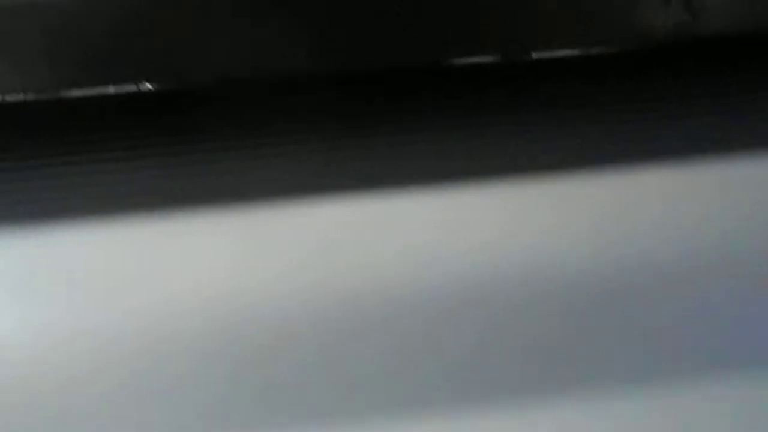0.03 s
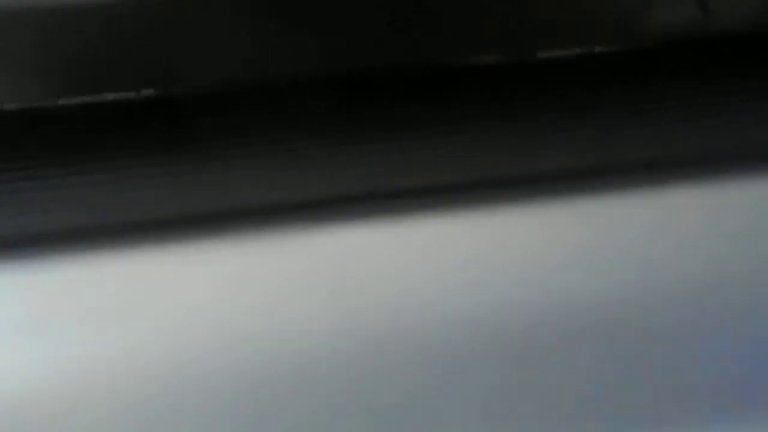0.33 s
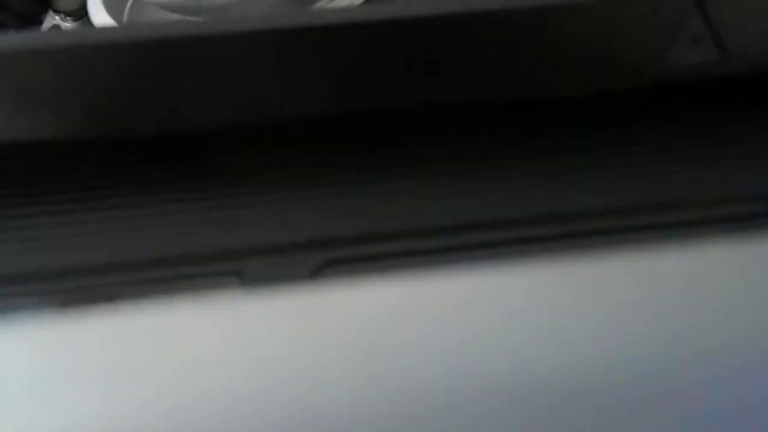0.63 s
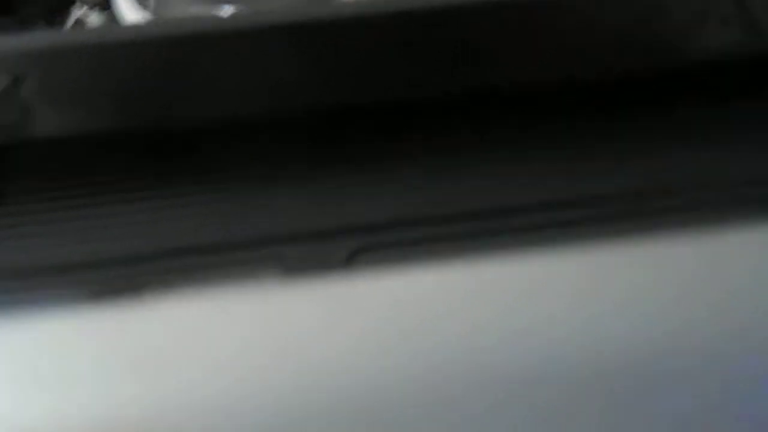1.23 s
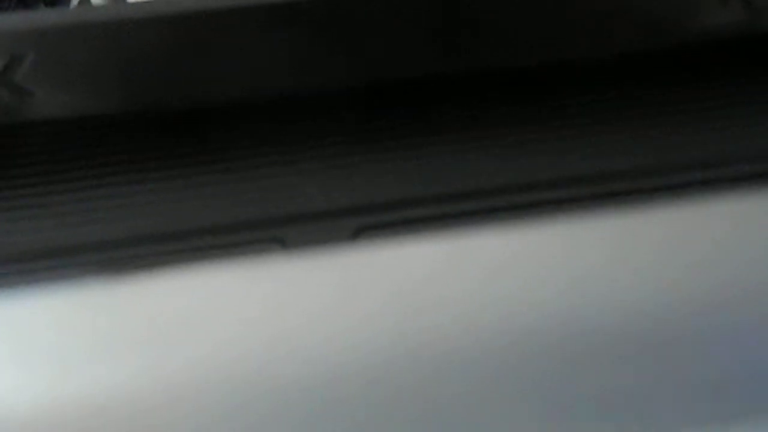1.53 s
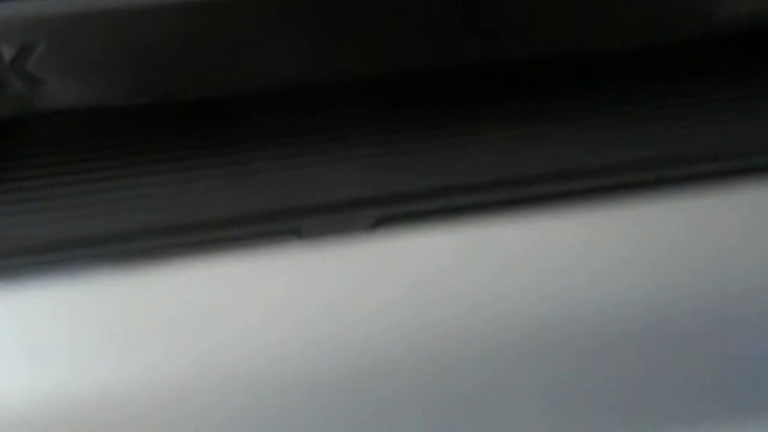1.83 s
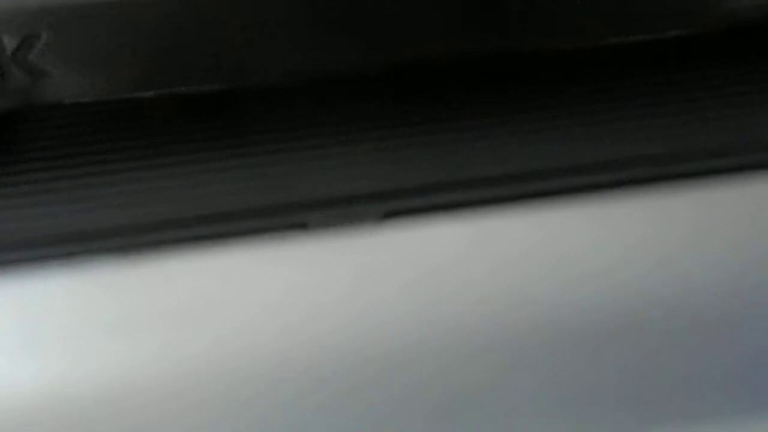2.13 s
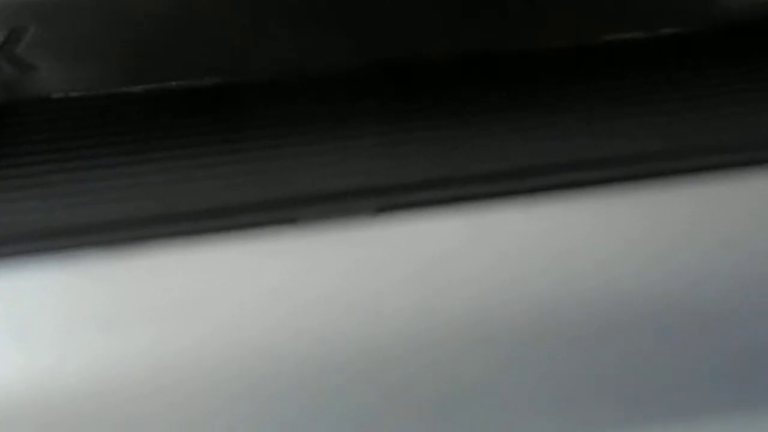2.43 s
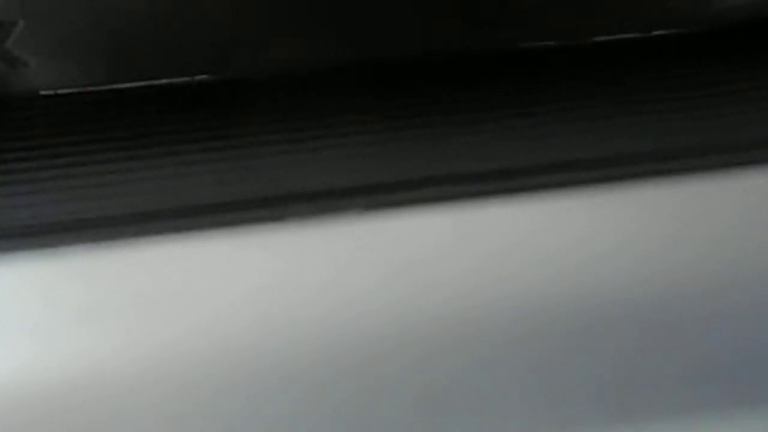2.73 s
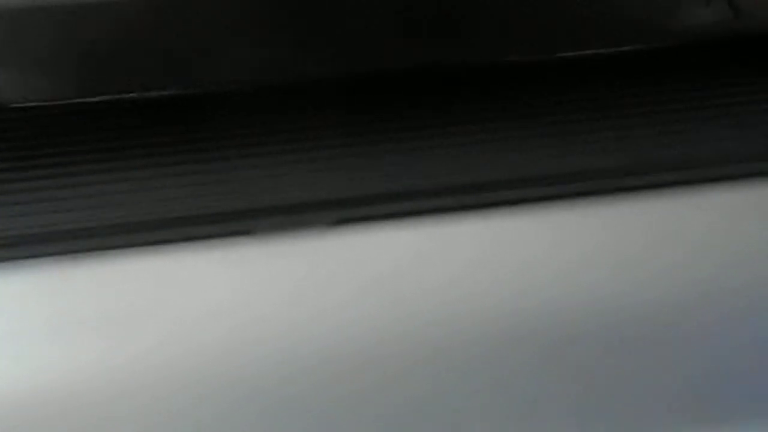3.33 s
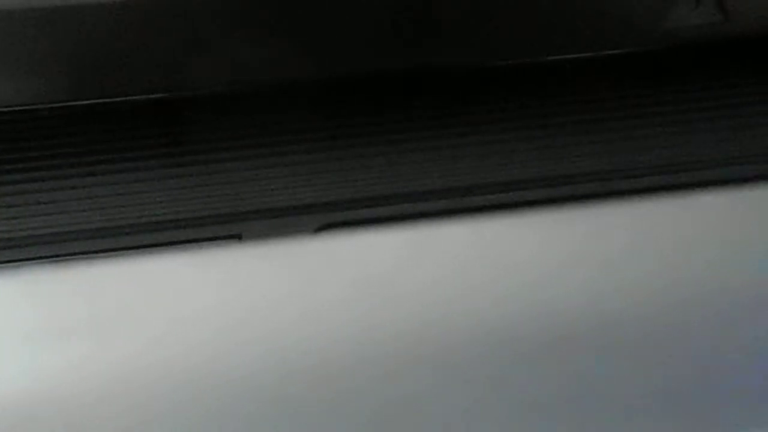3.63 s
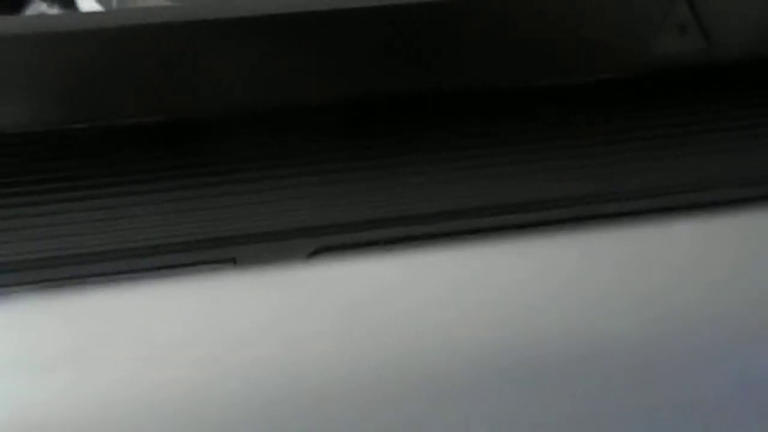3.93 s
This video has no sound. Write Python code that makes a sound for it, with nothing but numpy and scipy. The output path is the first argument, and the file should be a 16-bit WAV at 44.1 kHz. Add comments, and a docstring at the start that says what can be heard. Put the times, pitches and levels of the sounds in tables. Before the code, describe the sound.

A video recorder mechanism whirs and clunks, then its loading motor grinds through gears.

```python
"""Close to the open deck of a video recorder. From the start the head drum whirs and its motor whines
over capstan tones and mains hum, while two heads brush the tape on each turn. From 0.3 s a sprung lever
rings, the mechanism clunks and ticks, and three times the running sound dips. At 2.5 s the loading
motor starts and the carriage thuds. Meshing teeth drive the resonances of the gearbox; the motor slows
under load, knocking once per turn, and runs free again near 3.6 s."""
import sys
import numpy as np
from scipy import signal
from scipy.fft import irfft
from scipy.io import wavfile

SR = 44100
rng = np.random.default_rng(int(sys.argv[2]) if len(sys.argv) > 2 else 0)


def persist_wave(psi):
    """Save psi, clipped to +-1, as 16-bit WAV."""
    counts = np.round(np.clip(psi, -1, 1) * 32767).astype(np.int16)
    wavfile.write(sys.argv[1], SR, np.atleast_2d(counts).T)


N = 176400
T = np.arange(N) / SR

# running drum: time_s, whir_db, brush_db, middle_whine_db
DRUM_LEVELS = [(0, -38, -60, -7), (.29, -36, -51.5, -20), (.38, -33.5, -46, 2), (.8, -33, -44, -0.5),
               (1.25, -32.5, -43.5, -0.5), (1.8, -33, -43.5, 0.5), (2.39, -32.5, -44.5, -1),
               (2.44, -32, -57, -10), (2.7, -46.5, -45, 1), (4, -39.5, -53.5, 7)]
# spectra of the whir, a head brushing the tape and a head meeting it: frequency_hz, density_db
WHIR_SPECTRUM = [(18, -45.5), (30, -19.5), (59, -31.5), (102, -28.5), (133, -31), (313, -21), (510, -22.5),
                 (605, -19.5), (651, -17), (701, -17.5), (754, -21), (811, -11.5), (1090, -11.5),
                 (1200, -9.5), (1610, -13.5), (1820, -14.5), (2210, -18.5), (3510, -13.5), (4830, -26.5),
                 (5590, -24), (6470, -25.5), (7680, -24.5), (10300, -36), (13400, -67), (22000, -120)]
BRUSH_SPECTRUM = [(300, -43), (4800, -4.5), (6600, -17.5), (7500, -1.5), (8200, -2.5), (8700, -28.5),
                  (10500, -34)]
ENTRY_SPECTRUM = [(300, -15), (2500, 6.5), (4050, -16), (4700, -4.5), (5600, 6.5), (6300, -5.5),
                  (7000, -8.5), (10000, -41)]
# steady partials of the capstan, motor drive and mains: pitch_hz, level_db
CAPSTAN_TONES = [(29, -69), (706, -54.5), (881, -50.5), (1001, -51), (1234, -48.5), (1323, -46.5),
                 (1412, -49), (1428, -55)]
DRIVE_TONES = [(4797, -60), (5997, -76.5), (6795, -60.5), (8797, -64.5), (9196, -79), (9996, -59),
               (10396, -68)]
HUM_TONES = [(50, -74), (100, -71)]
# capstan loudness: time_s, gain_db
CAPSTAN_GAIN = [(0, -0.5), (.3, 0.5), (.5, 6), (1.1, 3), (2.3, 5), (2.7, 0), (3.5, 9.5), (4, 4.5)]
# drum motor partials: multiple_of_drum_rate, level_db
WHINE_HARMONICS = [(46, -53), (48, -35), (54, -62), (72, -40.5), (74, -65), (144, -47), (162, -57.5),
                   (220, -61.5), (240, -58)]
# drum motor loudness: time_s, whine_gain_db, drive_gain_db
MOTOR_GAINS = [(0, -6, -2.5), (.3, -4, 0.5), (.39, 2, -2), (2.38, 2.5, -5.5), (2.46, 0.5, 2),
               (2.9, -3.5, -4), (4, -4.5, -6)]

# blows on a sprung lever: start_s, level_db
SPRING_STRIKES = [(0.296, -16.5), (0.781, -28), (2.2545, -12.5)]
# its modes: pitch_hz, level_db, t60_s
SPRING_MODES = [(1019, 6.5, 0.053), (1127, 4, 0.024), (854, -18.5, 0.074), (1380, -7, 0.066),
                (3150, -1, 0.019)]
# clunks of the mechanism, including a run of knocks, one per turn, from the loading motor under load
# (2.86 to 2.99 s): start_s, body_db, crack_db, body_t60_s
MECHANISM_CLUNKS = [(0.3147, -31, -20.5, 0.017), (0.32, -13.5, -16, 0.047), (0.3356, -19.5, -17.5, 0.11),
                    (2.405, -34, -18, 0.049), (2.415, -27, -25, 0.085), (2.506, -21, -10.5, 0.062),
                    (2.538, -21, -13, 0.03), (2.551, -30, -16.5, 0.029), (2.588, -19.5, -15, .05),
                    (2.862, -15.5, -23, 0.031), (2.887, -13, -38, 0.011), (2.911, -11, -33, 0.011),
                    (2.9348, -9.5, -19, 0.012), (2.985, -13.5, -14.5, 0.051), (3.911, -17.5, -23, .05),
                    (3.918, -38, -18, .04)]
# spectra of a clunk's body, its crack and a tick: frequency_hz, density_db
CHASSIS_SPECTRUM = [(60, -31), (200, -28.5), (330, -3), (480, -11), (650, 2), (1050, 9), (1400, 1),
                    (2000, -43), (4000, -43), (10000, -70)]
CRACK_SPECTRUM = [(200, -22.5), (1000, 10.5), (1700, 12.5), (2400, -2.5), (3300, 4), (4200, -1.5),
                  (5200, -4.5), (7000, -11.5), (9000, -27.5), (11000, -39)]
TICK_SPECTRUM = [(150, -15), (1000, 1), (3000, -9), (5000, 2), (7000, 3), (8200, 3), (9500, -1),
                 (11000, -29)]
# dips in the running sound: start_s, depth_db
LEVEL_DIPS = [(.345, 9.5), (0.482, 5.5), (1.269, 10)]
# light impacts: start_s, level_db
SHARP_TICKS = [(0.467, -24), (0.4734, -19.5), (0.73, -27.5), (1.1665, -26.5), (1.26, -16.5), (2.932, -26),
               (3.7505, -16), (3.919, -22.5)]

# loading motor shaft: time_s, turns_per_s
SHAFT_SPEED = [(2.5, 38), (2.56, 47), (2.65, 50.6), (2.73, 51.2), (2.82, 43.3), (2.9, 41), (2.98, 39.8),
               (3.07, 41.3), (3.17, 43.5), (3.24, 39), (3.31, 33), (3.39, 32.3), (3.48, 39.5), (3.55, 46.7),
               (3.63, 48.3), (3.78, 48.05), (3.87, 48.3), (3.96, 44.5)]
# gear train loudness: time_s, gears_db, hiss_db
GEAR_LEVELS = [(2.52, -20, -40), (2.61, -18, -30.5), (2.75, -20, -32.5), (2.9, -19.5, -33.5),
               (3.05, -21, -36), (3.24, -19.5, -33), (3.33, -22, -33), (3.46, -18, -31.5),
               (3.6, -17.5, -30.5), (3.748, -17, -32), (3.758, -24.5, -37.5), (3.89, -23.5, -40),
               (4.0, -23.5, -39)]
# growl, mesh tones and knocks, each relative to gears_db: time_s, gain_db
GROWL_GAIN = [(2.5, -1.5), (2.8, -3.5), (2.9, -4), (3.05, -3), (3.4, -4), (3.6, -4.5), (3.88, -6), (4, -4)]
MESH_GAIN = [(2.5, -13.5), (2.7, -5), (2.95, -9.5), (3.15, -6.5), (3.4, -6.5), (3.55, -7), (3.65, -4),
             (3.86, -4), (4, -14.5)]
KNOCK_GAIN = [(2.5, -11), (2.66, -9.5), (2.8, -18), (2.86, -14), (3.0, -11), (3.1, -12), (3.38, -17),
              (3.46, -4.5), (3.6, -7.5), (3.75, -5), (3.88, -6.5), (4, -3)]
# irregular part of the force behind the growl: time_s, power_share
RATTLE_SHARE = [(2.5, 0), (2.7, 0.51), (2.8, 0.87), (3.1, 0.52), (3.45, 0.7), (3.63, 0.14), (3.86, 0.04),
                (3.92, 0.08), (4, 0.4)]
# gearbox response and gear hiss: frequency_hz, density_db
GEARBOX_SPECTRUM = [(40, -57), (120, -30.5), (250, -19.5), (400, -13), (500, -15.5), (570, -9.5), (650, -1),
                    (830, 0.5), (920, -3.5), (1060, 3), (1210, -5.5), (1310, -4), (1480, -1), (1620, -5),
                    (1800, -9), (2050, -15), (3500, -21), (5000, -27.5), (10000, -66)]
HISS_SPECTRUM = [(200, -36), (1500, -10), (2400, -6), (2900, -7.5), (3400, -1.5), (3900, -3.5),
                 (4400, -6.5), (4950, -5), (5550, -2.5), (6200, -3.5), (7200, -6.5), (8200, -15),
                 (9300, -16.5), (10500, -28)]
# partials of the meshing force: multiple_of_shaft_rate, level_db
MESH_HARMONICS = [(4, -11), (6, -3.5), (9, 5), (12, -3.5), (13, -8.5), (15, -1), (16, -8), (18, 2), (24, 3),
                  (30, -1.5), (36, -0.5), (48, 3.5)]
# worm gear modes: pitch_hz, level_db, t60_s
WORM_MODES = [(1121, 2.5, 0.019), (1500, -17, 0.028), (797, -8.5, 0.046)]
# metal parts that the gears set ringing: pitch_hz, bandwidth_hz, level_re_hiss_db
METAL_RESONANCES = [(2375, 48, -10), (2865, 55, -14.5), (3337, 64, -8), (4377, 110, -9), (5505, 89, -6),
                    (5910, 150, -13)]
# carriage impacts: start_s, level_db
CARRIAGE_THUDS = [(2.52, -34), (2.589, -22), (2.768, -37), (3.911, -42)]
# their spectrum: frequency_hz, density_db
THUD_SPECTRUM = [(40, -23), (130, -15), (220, 6), (290, 3.5), (450, -11), (2000, -61)]

DRUM_HZ, MOTOR_ON_S = 25, 2.505


def amp(db):
    """Amplitude ratio of a level in decibels."""
    return 10 ** (np.asarray(db) / 20)


def unit(x):
    """Normalisation to rms 1."""
    return x / np.sqrt(np.mean(x ** 2) + 1e-20)


def curve(rows, column=1):
    """Linear interpolation of a timed table at every sample."""
    rows = np.array(rows)
    return np.interp(T, rows[:, 0], rows[:, column])


def add(mix, start_s, sound):
    """Superposition of a delayed sound on the mix."""
    part = mix[round(start_s * SR):][:len(sound)]
    part += sound[:len(part)]


def colour(x, spectrum, size=8192):
    """Minimum-phase filtering by the given spectrum; rms 1."""
    points_hz, db = np.transpose(spectrum)
    hz = abs(np.fft.fftfreq(size, 1 / SR))
    log_gain = np.log(amp(np.interp(np.log(hz + 1), np.log(points_hz), db)))
    response = np.fft.ifft(np.exp(np.conj(signal.hilbert(log_gain)))).real[:size // 2]
    return unit(signal.oaconvolve(x, response)[:len(x)])


def resonate(x, hz, width_hz):
    """Forced response of one resonance with peak gain 1."""
    return signal.lfilter(*signal.iirpeak(hz, hz / width_hz, SR), x)


def noise():
    """Gaussian white noise."""
    return rng.standard_normal(N)


def revolving(turns, scatter_rad, count=420, size=8192):
    """Periodic force of a rough rotating surface; little phase scatter gives one knock per turn."""
    surface = irfft(np.r_[0, np.exp(1j * scatter_rad * rng.standard_normal(count))], size)
    return unit(np.interp(turns % 1, np.arange(size) / size, surface))


def tone(cycles):
    """Simple harmonic motion of random phase; rms 1."""
    return np.sqrt(2) * np.sin(2 * np.pi * (cycles + rng.random()))


def partials(rows, base):
    """Superposed sines: rates in hertz on a base of seconds, or multiples on a base of turns."""
    return sum(amp(db) * tone(rate * base) for rate, db in rows)


def blend(a, b, share):
    """Incoherent signals add in power; b takes the given share."""
    share = np.clip(share, 0, 1)
    return np.sqrt(1 - share) * a + np.sqrt(share) * b


def ring(modes, rise_s, size):
    """Free vibration: each mode decays exponentially."""
    t = T[:size]
    vibration = sum(amp(db - 60 * t / t60_s) * np.sin(2 * np.pi * hz * t) for hz, db, t60_s in modes)
    return vibration * (1 - np.exp(-t / rise_s))


def impact(spectrum, t60_s, blow=3.8, size=12000):
    """An impulse excites dense modes that decay together like fading noise."""
    fade = amp(-60 * T[:size] / t60_s)
    force = rng.choice([-1., 1.], size) * fade
    force[0] += blow
    return colour(force, spectrum) * np.sqrt(np.mean(fade ** 2))


def drum_whir(turns):
    """Rotation makes partly periodic noise, amplitude-modulated twice per turn."""
    rub = blend(noise(), revolving(turns, 10.22), 0.58)
    throb = 1 + 0.076 * np.cos(4 * np.pi * turns)
    softened = [(hz, db - 2.5 * (hz > 5000)) for hz, db in WHIR_SPECTRUM]
    return amp(curve(DRUM_LEVELS)) * colour(rub * throb, softened)


def capstan():
    """Steady rotation gives partials of fixed pitch, which swell and fade together."""
    return amp(curve(CAPSTAN_GAIN)) * partials(CAPSTAN_TONES, T)


def tape_heads(turns):
    """Friction in pulses: each of two heads rasps as it meets the tape, then brushes along it."""
    period_s = 0.5 / DRUM_HZ

    def contact(spectrum, at_s, width_s):
        """Surface roughness excites noise under a Gaussian envelope at each pass."""
        offset_s = (T - at_s + period_s / 2) % period_s - period_s / 2
        surface = blend(revolving(2 * turns, 10.97, count=210), revolving(turns, 10.04), 0.3)
        grain = blend(surface, noise(), 0.11)
        return colour(grain * np.exp(-0.5 * (offset_s / width_s) ** 2), spectrum)

    brush = contact(BRUSH_SPECTRUM, at_s=0.0019, width_s=0.0024)
    rasp = amp(1) * contact(ENTRY_SPECTRUM, at_s=0.01735, width_s=0.0028)
    balance = np.where(T < 0.4, 1 + np.cos(2 * np.pi * turns), 1)  # one head dominates at first
    return amp(curve(DRUM_LEVELS, 2)) * (brush + rasp) * balance


def flutter(rms_db=1.3, fastest_hz=22.01):
    """Random amplitude modulation: a gain that wavers with a sum of slow sines."""
    return amp(rms_db * unit(sum(tone(hz * T) for hz in rng.uniform(0, fastest_hz, 24))))


def drum_motor(turns):
    """Harmonics of the rotation rate make a whine, beside the thin fixed tones of the drive."""
    middle_gain = amp(curve(DRUM_LEVELS, 3)) * (1 + 0.3 * np.cos(4 * np.pi * turns))
    whine = sum(amp(db) * tone(k * turns) * (middle_gain if 1000 < k * DRUM_HZ < 1500 else 1)
                for k, db in WHINE_HARMONICS)
    drive = partials(DRIVE_TONES, T)
    return amp(curve(MOTOR_GAINS)) * flutter() * whine + amp(curve(MOTOR_GAINS, 2)) * drive


def mains_hum():
    """Alternating current hums at its fundamental and second harmonic."""
    return partials(HUM_TONES, T)


def mechanism_impacts():
    """Impact excitation: a spring rings in a few modes; clunks, motor knocks and ticks in many."""
    out = np.zeros(N)
    spring = ring(SPRING_MODES, rise_s=0.0038, size=SR // 2)
    for start_s, db in SPRING_STRIKES:
        add(out, start_s, amp(db) * spring)
    for start_s, body_db, crack_db, body_t60_s in MECHANISM_CLUNKS:
        add(out, start_s, amp(body_db) * impact(CHASSIS_SPECTRUM, body_t60_s))
        add(out, start_s, amp(crack_db) * impact(CRACK_SPECTRUM, t60_s=0.032))
    for start_s, db in SHARP_TICKS:
        add(out, start_s, amp(db) * impact(TICK_SPECTRUM, t60_s=0.0073))
    return out


def dip_gain(fall_s=0.0083, recover_s=0.42):
    """Exponential relaxation: the level drops quickly at set times and creeps back."""
    dip_db = 0
    for start_s, depth_db in LEVEL_DIPS:
        age_s = np.maximum(T - start_s, 0)
        dip_db += depth_db * np.minimum(age_s / fall_s, 1) * np.exp(-age_s / recover_s)
    return amp(-dip_db)


def gear_teeth(turns, throb):
    """Forced vibration: meshing and rattling teeth drive the gearbox; a panel booms under load."""
    share = curve(RATTLE_SHARE)
    rattle = unit(noise() * (1 + 0.57 * throb))
    growl = colour(blend(revolving(turns, scatter_rad=1.66), rattle, share), GEARBOX_SPECTRUM)
    mesh = colour(partials(MESH_HARMONICS, turns), GEARBOX_SPECTRUM)
    gears = (amp(curve(GROWL_GAIN)) * growl + amp(curve(MESH_GAIN)) * mesh) * (1 + 0.067 * throb)
    panel = 1.8 * share * resonate(gears, hz=632, width_hz=41)
    return gears + panel


def worm_knocks(turns):
    """An impulse train, one knock per turn, rings the worm gear; rattle makes the knocks uneven."""
    whole_turns = np.floor(turns)
    running = T > MOTOR_ON_S
    strengths = amp(4 * curve(RATTLE_SHARE) * noise())
    impulses = np.diff(whole_turns, prepend=whole_turns[0]) * strengths * running
    knocks = signal.oaconvolve(impulses, ring(WORM_MODES, rise_s=0.001, size=3000))[:N]
    return amp(curve(KNOCK_GAIN)) * unit(knocks) * np.sqrt(np.mean(running))


def gear_hiss(turns, throb):
    """Broadband gear noise pulses with the shaft, and metal parts resonate in narrow bands."""
    rub = blend(noise(), revolving(turns, 10.14), 0.45) * (1 + 0.19 * throb)
    metal = sum(amp(db) * unit(resonate(noise(), hz, width_hz)) for hz, width_hz, db in METAL_RESONANCES)
    return colour(rub, HISS_SPECTRUM) + metal


def loading_motor(knock_at_s=3.7215, rise_s=0.025):
    """Shaft angle, the integral of speed, keeps teeth, knocks and hiss in phase."""
    turns = np.cumsum(curve(SHAFT_SPEED)) / SR
    turns -= np.interp(knock_at_s, T, turns)
    throb = np.cos(2 * np.pi * turns)  # peaks at each worm knock
    gears = amp(curve(GEAR_LEVELS)) * (gear_teeth(turns, throb) + worm_knocks(turns))
    hiss = amp(curve(GEAR_LEVELS, 2)) * gear_hiss(turns, throb)
    return np.clip((T - MOTOR_ON_S) / rise_s, 0, 1) * (gears + hiss)


def carriage():
    """Impacts of the carriage excite low, damped modes, heard as thuds."""
    out = np.zeros(N)
    for start_s, db in CARRIAGE_THUDS:
        add(out, start_s, amp(db) * impact(THUD_SPECTRUM, t60_s=0.11))
    return out


def scene():
    """Superposition of all sources in one channel; only the running sound dips."""
    turns = DRUM_HZ * T
    running = drum_whir(turns) + capstan() + tape_heads(turns) + drum_motor(turns) + mains_hum()
    return (running * dip_gain() + mechanism_impacts() + loading_motor() + carriage())[None]


def record(dry, cutoff_hz=10700):
    """Linear-phase low-pass filtering removes the highest treble."""
    lowpass = signal.firwin(401, cutoff_hz, window=("kaiser", 8), fs=SR)
    return signal.oaconvolve(dry, lowpass[None], "same")


dry = scene()
out = record(dry)
persist_wave(out)
```